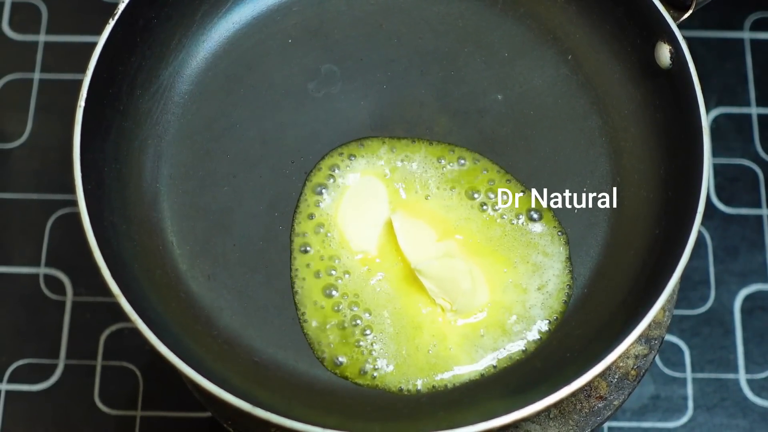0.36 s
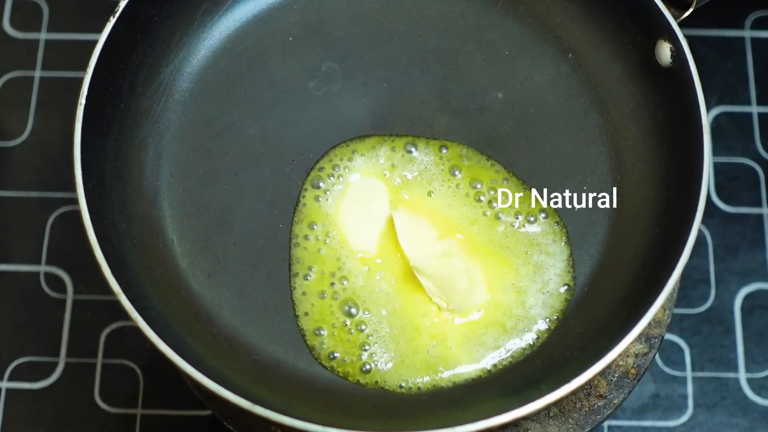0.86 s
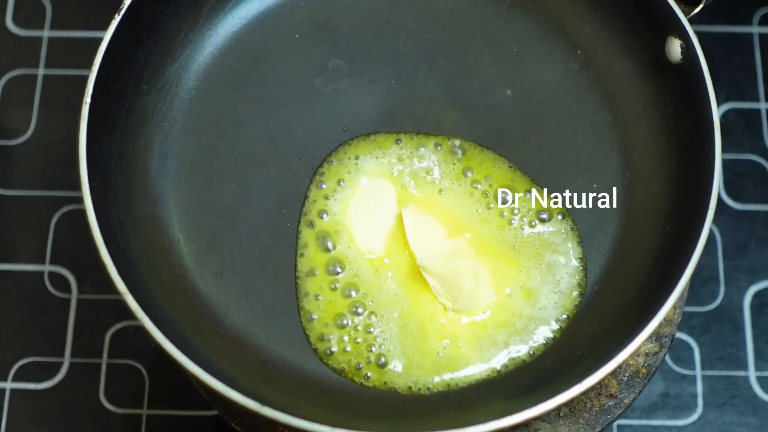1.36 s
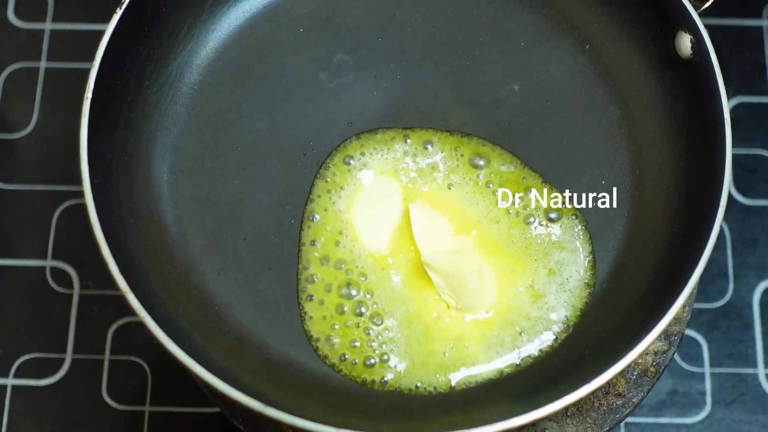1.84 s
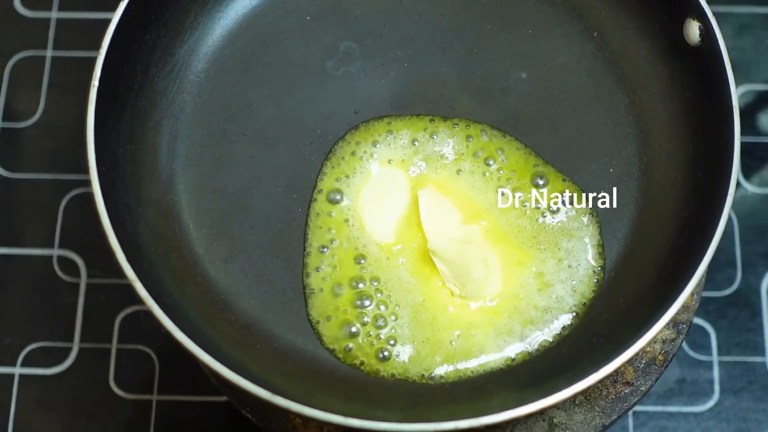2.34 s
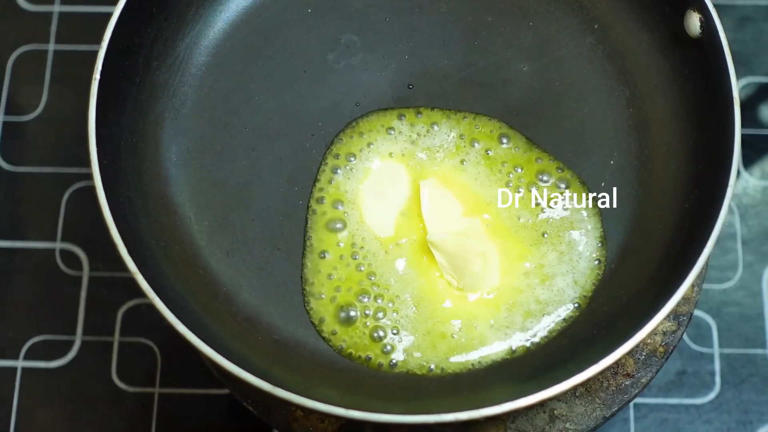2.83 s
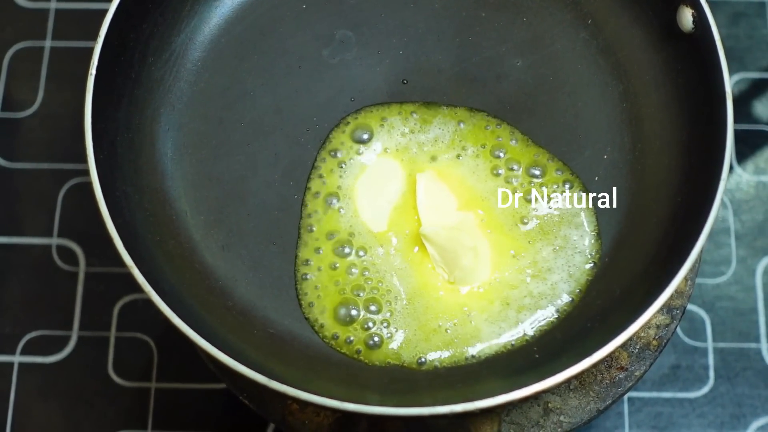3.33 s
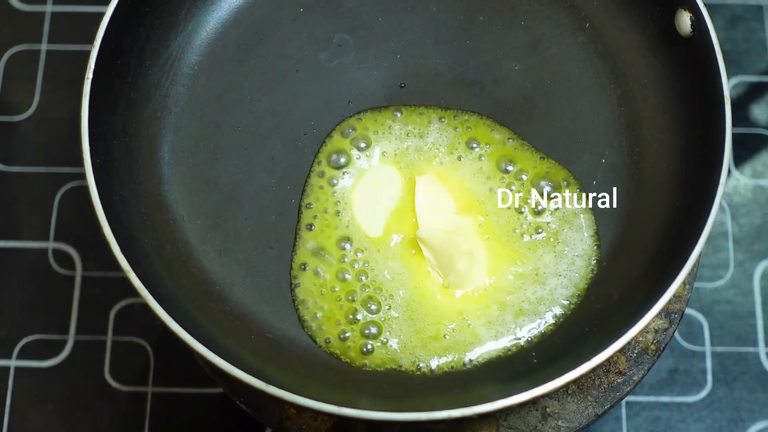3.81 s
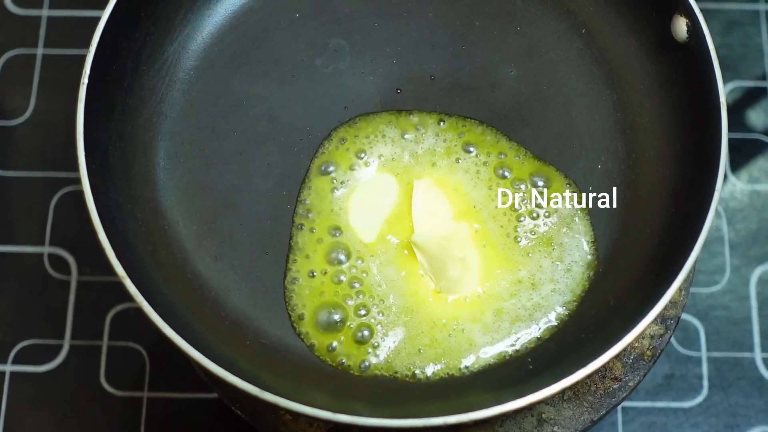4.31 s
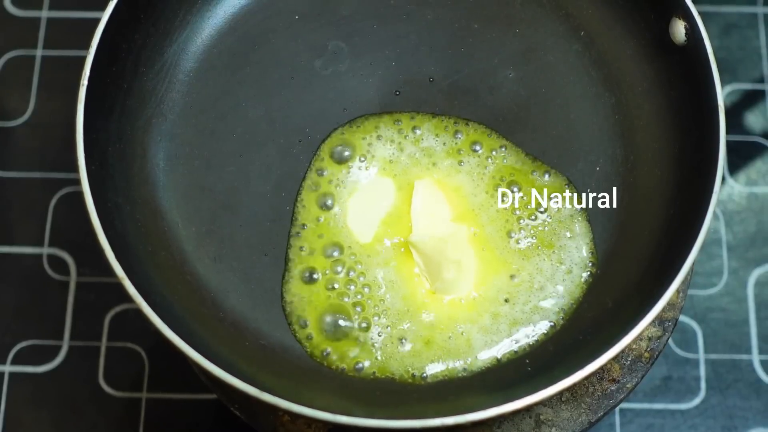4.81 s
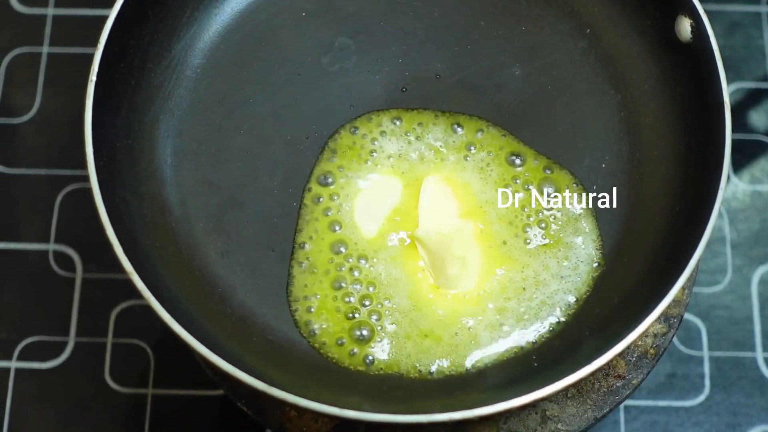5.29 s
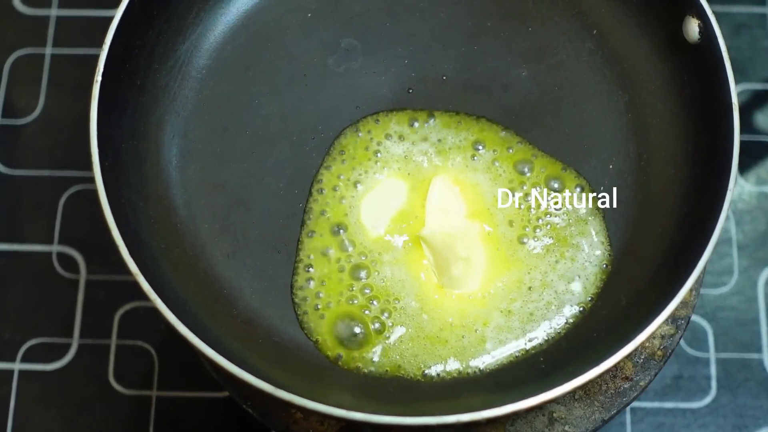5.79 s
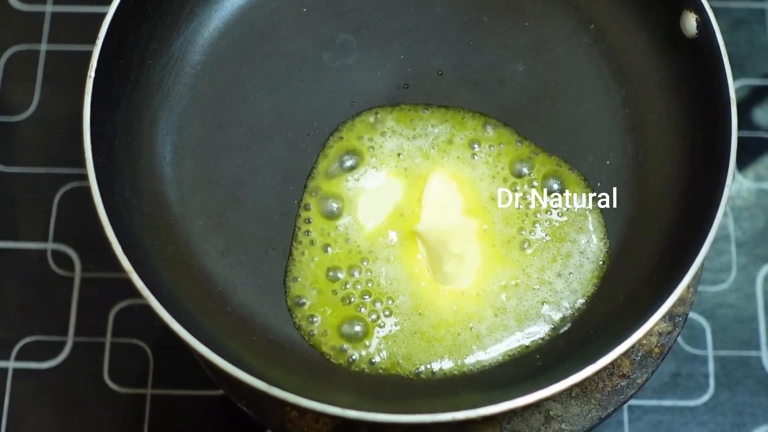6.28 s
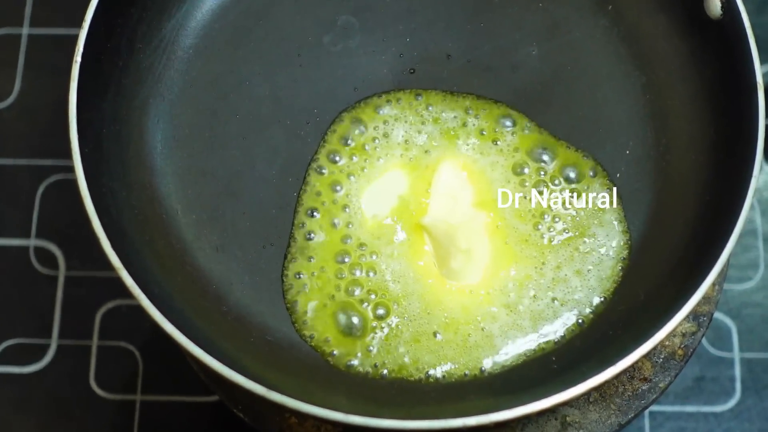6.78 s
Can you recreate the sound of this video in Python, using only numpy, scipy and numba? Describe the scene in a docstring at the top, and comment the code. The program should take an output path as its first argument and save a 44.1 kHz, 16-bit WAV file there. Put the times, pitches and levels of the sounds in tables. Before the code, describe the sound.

Close above a hot pan, melting butter sizzles continuously: a thin, bright, flickering hiss full of tiny bubble clicks, with sharper dry pops scattered on top. For the first two seconds it is fairly gentle and sparse; from about 2 seconds it thickens and crackles more often, its strength gently rising and falling. Faint muffled thuds come from far off around 0.8 and 1.6 to 2.4 seconds. At 2.96 the heated metal gives a sharp ringing tick, with weaker ones until about 3.4. A particularly sharp pop snaps at 4.1. At 5.44 something hard is knocked nearby, then from 5.85 to 5.98 it clatters loudly in a quick cluster, hollow and bright, with a thin steel shimmer abruptly damped. The sizzling and popping continue to the end at about 6.9 seconds. A very quiet low kitchen rumble lies beneath; the space is small and nearly dry.

```python
"""A quiet kitchen, microphone close above a hot frying pan in which butter melts. Steam bubbles burst through
the fat: countless tiny damped sines and noise hiss, with louder bursts on top. The heating metal ticks now and
then, ringing the pan's modes. Something hard is knocked nearby, then rattles briefly with a thin steel ring and
is stopped. The kitchen rumbles underneath in filtered noise, with a few soft thuds, some of them light knocks
on the hard object."""
import sys
import numpy as np
from scipy import signal
from scipy.fft import rfft, irfft
from scipy.io import wavfile
from scipy.ndimage import uniform_filter1d, map_coordinates
from numba import njit

SR = 44100
rng = np.random.default_rng(int(sys.argv[2]) if len(sys.argv) > 2 else 0)


def to_linear_factor(level_db):
    """Convert decibel levels (scalar or array-like) to linear amplitude factors."""
    exponent = np.asarray(level_db, float) / 20
    return 10 ** exponent


def persist_wave(psi):
    """Save psi, clipped to +-1, as 16-bit WAV."""
    counts = np.round(np.clip(psi, -1, 1) * 32767).astype(np.int16)
    wavfile.write(sys.argv[1], SR, np.atleast_2d(counts).T)


N = 304290
T = np.arange(N) / SR

# how hard the fat boils: time_s, level_db
BOIL = [(0.0, -44), (0.19, -44), (1.82, -40), (2.25, -37), (2.77, -40.5), (2.94, -40), (3.0, -38),
        (3.73, -40), (3.94, -37.5), (4.09, -38.5), (4.24, -39), (5.03, -40), (5.75, -38), (5.92, -39),
        (6.34, -39), (6.9, -37)]
# colour of the fizz inside the pan: freq_hz, gain_db
FIZZ_TONE = [(290, -104), (500, -25), (710, -17), (822, 1.5), (938, -9.5), (1090, 0), (1260, -6),
             (1390, -2.5), (1840, -7), (2980, 0.5), (5840, -1.5), (13100, -7.5), (15100, 2), (15800, 7.5),
             (16500, -63)]
# blows on the hard object: start_s, level_db, body_db (against the blow),
# body_tilt_db_per_octave, clack_tilt_db_per_octave
BLOWS = [(5.44, -11.5, -7, 4, -9), (5.583, -34.5, 2, 1, -4), (5.661, -34.5, -3.5, -5.5, -4),
         (5.847, -3.5, -16, -2, 8), (5.856, -12, -8, 6, -7), (5.862, -11.5, -22, -4, -9),
         (5.871, -7, -13.5, -2.5, -2), (5.887, -6.5, -19, 0, 5), (5.893, -11.5, -6, -2.5, -6),
         (5.898, -7, -6, -1, 4), (5.904, -19, 4.5, 2.5, -10), (5.908, -22, -6, -7, -2),
         (5.921, -8.5, -6.5, -2, 2), (5.934, -13.5, -4.5, -3, 4), (5.939, -23, -0.5, -9.5, 0),
         (5.957, -12, -8, 1, 2), (5.968, -29, -9, -2, 0), (5.979, -23.5, -4.5, -2, -1)]
RATTLE_S, STOP_S = 5.848, 5.985  # the loose rattle starts, and is stopped


def level(x, db):
    """Scale to an rms level."""
    return x * to_linear_factor(db) / np.sqrt(np.mean(x ** 2))


def curve(rows, axis=1):
    """One column of a table at every sample."""
    rows = np.array(rows)
    return np.interp(T, rows[:, 0], rows[:, axis])


def colour(x, points):
    """Smooth filter through (Hz, dB) points, straight lines over log frequency."""
    hz, db = np.transpose(points)
    f = np.maximum(np.arange(N // 2 + 1) * SR / N, 1)
    return irfft(rfft(x) * to_linear_factor(np.interp(np.log(f), np.log(hz), db)), N)


def band(x, lo_hz, hi_hz, order=2):
    """Band-pass."""
    return signal.sosfilt(signal.butter(order, [lo_hz, hi_hz], "band", fs=SR, output="sos"), x)


def walk(rate):
    """Random values, rate of them a second, joined by straight ramps; spread near 1."""
    k = int(SR / rate)
    held = np.repeat(rng.standard_normal(N // k + 1), k)
    return uniform_filter1d(held, k)[:N]


@njit
def ring(n, start, hz, fade, size, glide, rise):
    """Sum of damped sines with a soft onset, each cut off some 52 dB down; hz and glide in radians a sample."""
    out = np.zeros(n)
    for e in range(len(start)):
        z, p = size[e] + 0j, np.exp(1j * hz[e] - fade[e])
        turn, gap = np.exp(1j * glide[e]), 1.
        for i in range(start[e], min(n, start[e] + int(6 / fade[e]))):
            gap *= rise
            out[i] += z.imag * (1 - gap)
            z *= p
            p *= turn
    return out


def rings(s, hz, t60, db, glide=0., rise_s=.0001):
    """Damped sines from times, pitches, decays and levels; glide = share the pitch rises over the t60."""
    s, hz, t60, db = np.broadcast_arrays(s, np.clip(hz, 20, SR * .45), np.maximum(t60, 1e-4), db)
    w = 2 * np.pi * hz.ravel() / SR
    span = t60.ravel() * SR
    rise = np.exp(-1 / (rise_s * SR))
    start = (s.ravel() * SR).astype(np.int64)
    return ring(N, start, w, np.log(1000) / span, to_linear_factor(db.ravel()), glide * w / span, rise)


def fizz(count, spread_db, cycles, clump_db):
    """Small bubbles at random: few are big, all sizes of pitch, bare clicks to short rings, swelling in clumps."""
    u = rng.random((count, 4))
    s = u[:, 0] * N / SR * .999
    hz = 700 * (16000 / 700) ** u[:, 1]
    size_db = np.minimum(-spread_db * np.log(1 - u[:, 2]), 18)
    t60 = cycles * 6 ** u[:, 3] / hz
    grains = rings(s, hz, t60, size_db + 5.38 * np.log2(hz / 1000), glide=0.22)
    return level(colour(grains * to_linear_factor(clump_db * walk(35)), FIZZ_TONE), 0)


def middling(count):
    """Rows like the loudest bubbles', at chance moments, louder when the fat boils harder."""
    over_boil_db, level_spread_db = 18, 3.5
    pitch_hz, pitch_spread_octaves = 4630, 0.455
    ring_s, ring_spread_octaves = 0.0086, 0.57  # before each layer of a burst takes its share
    treble_db, treble_spread_db = -13.5, 8
    s, c = rng.random(count) * N / SR, rng.standard_normal((count, 4)).T
    db = np.interp(s, T, curve(BOIL)) + over_boil_db + level_spread_db * c[0]
    hz = pitch_hz * 2 ** (pitch_spread_octaves * c[1])
    t60 = ring_s * 2 ** (ring_spread_octaves * c[2])
    return np.c_[s, db, hz, t60, treble_db + treble_spread_db * c[3]]


def spits(s, db):
    """Each burst lets out a short ragged jet of steam: noise under an exponential fade."""
    jet_db, fade_s = -23, 0.0042  # start of the fade against the burst; time constant
    at = np.minimum((s.ravel() * SR).astype(int), N - 1)
    kicks = np.bincount(at, to_linear_factor(db.ravel() + jet_db), N)
    jet = signal.lfilter([1], [1, -np.exp(-1 / (fade_s * SR))], kicks)
    steam = level(colour(rng.standard_normal(N), FIZZ_TONE), 0)
    return jet * steam * to_linear_factor(3.2 * walk(600))


def sizzle():
    """Fine fizz and steam hiss follow the boil; a big bubble snaps its film, then its torn cavity rings roughly."""
    # the loudest bubbles: start_s, level_db, pitch_hz, ring_s, treble_db (snap against the bubble);
    # the layers below offset the levels and shorten the rings
    pops = [(0.1263, -7.5, 8000, 0.0013, -5), (0.268, -9, 5500, 0.0031, -6),
            (0.2896, -16, 9600, 0.0052, 5.5), (0.717, -12.5, 6000, 0.0047, 1),
            (0.7305, -13, 4860, 0.013, -20), (0.802, -6, 9990, 0.0023, -6),
            (0.8689, -11.5, 7240, 0.0044, -22), (0.9361, -17, 4320, 0.023, -20),
            (1.114, -5, 5400, 0.0045, -17), (1.2808, -10.5, 3260, 0.0041, -26),
            (1.4727, -6, 3260, 0.0039, -24), (1.483, -15.5, 4360, 0.017, -9),
            (1.65, -19.5, 9500, 0.0049, 2), (1.6928, -22.5, 1630, 0.04, 15.5),
            (1.6935, -24, 2650, 0.037, -10), (1.7784, -14, 5740, 0.0069, -19),
            (1.827, -14, 4670, 0.014, -1), (2.06, -8, 6600, 0.0062, -17), (2.262, -9, 7500, 0.027, -19),
            (2.2848, -12.5, 6100, 0.0067, -17), (2.329, -14.5, 4330, 0.015, -26),
            (2.3544, -13, 1610, 0.021, -20), (2.3884, -16, 12360, 0.0094, -1),
            (2.4266, -19, 4300, 0.021, -29), (2.521, -11, 4430, 0.0054, -21),
            (2.5587, 0, 7200, 0.0027, -26), (2.571, -16, 9450, 0.0019, -30),
            (2.7767, -11, 5200, 0.0074, -19), (2.8153, -7, 2820, 0.0036, -18),
            (2.8257, -20, 5800, 0.0298, 10), (2.8607, -14, 6400, 0.011, -16),
            (2.9976, -16, 4480, 0.0069, 3), (3.02, -8.5, 6460, 0.0044, -8),
            (3.0737, -13.5, 4240, 0.024, -26), (3.0986, -15, 5160, 0.0053, -23),
            (3.221, -14.5, 3320, 0.0034, -21), (3.2632, -6.5, 4360, 0.0067, -19),
            (3.4511, -8, 5720, 0.011, -24), (3.5001, -8, 8550, 0.0078, -19), (3.697, -13, 7540, 0.005, -10),
            (3.7308, -3.5, 5900, 0.0018, -2), (3.736, -8, 1570, 0.0057, 2), (3.765, -7, 4600, 0.005, -20),
            (3.797, -12, 4460, 0.008, -26), (3.8021, -15.5, 5230, 0.013, -10),
            (3.8488, -12, 5160, 0.0061, -10), (3.9254, -13.5, 5000, 0.0085, -23),
            (4.0077, -14, 6400, 0.014, -22), (4.027, -13, 4700, 0.011, -24), (4.054, -7, 5100, 0.0086, -27),
            (4.0821, -9.5, 3480, 0.0047, -23), (4.1154, 3.5, 6730, 0.0012, -23),
            (4.1266, -17, 5000, 0.0024, -21), (4.1464, -12.5, 7100, 0.0096, -28),
            (4.2248, -10, 7450, 0.014, -21), (4.2531, -13.5, 2890, 0.029, -22),
            (4.2715, -13, 6900, 0.0056, 4.5), (4.3767, -29, 5500, 0.0089, -12),
            (4.3907, -15.5, 5300, 0.024, -20), (4.415, -20, 3630, 0.019, -15),
            (4.4977, -9, 5800, 0.013, -23), (4.5219, -12, 1250, 0.0044, -13),
            (4.6024, -11.5, 6200, 0.0096, -17), (4.625, -11, 3670, 0.0063, -20),
            (4.6334, -2, 2870, 0.0021, -0.5), (4.6536, -10.5, 5940, 0.012, -17),
            (4.731, -12, 3630, 0.0095, -18), (4.8063, -14, 5320, 0.035, -21),
            (4.8804, -12, 2500, 0.0045, -21), (4.8894, -15, 7490, 0.0036, 1.5),
            (4.937, -10, 5900, 0.0018, -14), (4.975, -5, 3050, 0.0034, -2),
            (5.0356, -9.5, 4550, 0.0036, -12), (5.064, -17.5, 3060, 0.015, -16),
            (5.08, -12.5, 4450, 0.01, -26), (5.0858, -18, 4060, 0.0047, 5), (5.1172, -8.5, 3500, 0.013, 0),
            (5.1285, -14, 9520, 0.0046, -9.5), (5.253, -13.5, 4050, 0.018, -25),
            (5.3698, -11.5, 7700, 0.0069, -6), (5.4117, -8.5, 7140, 0.0079, -19),
            (5.4889, -21.5, 3790, 0.0086, 14.5), (5.572, -14, 6720, 0.0036, -19),
            (5.6382, -13.5, 5080, 0.014, -20), (5.741, -6, 3570, 0.0029, -24),
            (5.7754, -10, 5700, 0.0061, -17), (5.7888, -8, 4100, 0.0088, -27),
            (5.8099, -10, 3530, 0.0047, -13), (5.8283, -17.5, 5040, 0.0068, -2),
            (6.0314, -21.5, 4800, 0.015, -15), (5.459, -20, 4400, 0.0043, 12),
            (5.836, -9, 4100, 0.0098, -16), (6.0541, -12.5, 4340, 0.018, -24),
            (6.0868, -11, 2970, 0.01, -21), (6.1131, -6.5, 5440, 0.0054, -23),
            (6.1313, -15.5, 7540, 0.0054, 8), (6.2591, -12.5, 7340, 0.008, -19),
            (6.298, -12, 3860, 0.0099, -30), (6.3592, -17, 7490, 0.017, -22),
            (6.4393, -16.5, 3520, 0.018, -27), (6.5861, -16.5, 4550, 0.014, -22),
            (6.6186, -5.5, 5300, 0.0045, -6), (6.6727, -6.5, 5330, 0.01, -27),
            (6.7355, -15, 3330, 0.0092, -15), (6.824, -10.5, 4460, 0.026, -27),
            (6.886, -17.5, 5650, 0.028, -20)]
    hiss = level(colour(rng.standard_normal(N), FIZZ_TONE), -8.5) * to_linear_factor(3.5 * walk(50))  # flickers
    froth = fizz(count=16000, spread_db=2.8, cycles=2.1, clump_db=3.5) * to_linear_factor(-4.0)
    bed = fizz(count=4000, spread_db=4.43, cycles=2.16, clump_db=3.5) * to_linear_factor(-2.0)
    boiling = to_linear_factor(curve(BOIL)) * (hiss + froth + bed)
    steady_hiss = level(band(rng.standard_normal(N), 4400, 19000), -56)

    s, db, hz, t60, treble_db = np.vstack([pops, middling(count=170)]).T[:, :, None]
    chance = rng.standard_normal((len(s), 9))
    bubble = rings(s, hz, t60 * 0.58, db - 3, glide=0.09, rise_s=0.00029)
    # splinters of the burst: nearby pitches, a fraction of a millisecond or so apart
    shred_s = s + 0.00056 * np.abs(chance[:, :4])
    shreds = rings(shred_s, hz * np.exp(0.34 * chance[:, 3:7]), t60 * 0.38, db - 9.5)
    snap_s = s + 0.00031 * np.abs(chance[:, 6:])
    snap = rings(snap_s, np.array([8500, 11500, 14500]), 0.0007, db + treble_db - 1.0)
    needle = rings(s, 4900.0, 0.00063, db - 6.5, rise_s=.00002)  # the first tear: one bare click
    return boiling + bubble + shreds + snap + needle + spits(s, db) + steady_hiss


def kitchen():
    """Low noise rumble nearly alike on both sides, a looser band above it, and soft thuds as damped sines, some
    of them light knocks on the hard object."""
    # strength of the rumble: time_s, low_db, upper_db
    rumble_levels = [(0.0, -59, -62.5), (0.4, -62.5, -63.5), (1.9, -65, -60.5), (2.09, -59, -56.5),
                     (3.59, -65.5, -61), (4.44, -61.5, -61), (4.8, -62.5, -60), (5.03, -54, -62),
                     (5.78, -63.5, -58), (5.98, -60, -53), (6.46, -65, -63.5), (6.9, -60, -60.5)]
    # colour of the low rumble: freq_hz, gain_db
    rumble_tone = [(20, -32), (45, -27), (62, -8), (90, -1), (112, -4.5), (135, -2), (160, -6), (250, -32)]
    # colour of the looser band: freq_hz, gain_db
    murk_tone = [(90, -23), (150, -4), (220, 0.5), (320, -1.5), (420, -5), (550, -3.5), (750, -0.5),
                 (1100, -30)]
    # soft thuds, including light early knocks on the hard object's body: start_s, level_db (before a common
    # trim), pitch_hz
    thuds = [(0.814, -45, 568), (0.83, -40, 576), (0.845, -38.5, 598), (1.563, -49, 251), (1.689, -49, 279),
             (1.946, -36.5, 233), (2.02, -37.5, 277), (2.352, -47, 260), (5.959, -32, 560)]
    low, upper = rng.standard_normal((2, 2, N))
    sides = np.array([[1], [-1]])
    low = low[0] + 0.29 * sides * low[1]
    upper = upper[0] + 0.51 * sides * upper[1]
    rumble = level(np.array([colour(v, rumble_tone) for v in low]), 0) * to_linear_factor(curve(rumble_levels))
    murk = level(np.array([colour(v, murk_tone) for v in upper]), 0) * to_linear_factor(curve(rumble_levels, axis=2))
    s, db, hz = np.transpose(thuds)
    return rumble + murk + rings(s, hz, 0.073, db - 1.5, rise_s=0.00035)


def struck(s, db, modes, tilt_db, rise_s):
    """Every blow rings all modes, tilted in dB per octave about the median mode, with a little chance."""
    delay_s = 0.0013  # the modes start this long after the listed time
    hz, mode_db, t60 = np.transpose(modes)
    share = np.outer(tilt_db, np.log2(hz / np.median(hz))) + 2 * rng.standard_normal((len(s), len(hz)))
    return rings(s[:, None] + delay_s, hz, t60, db[:, None] + mode_db + share, rise_s=rise_s)


def ticks():
    """Hot metal slips, then slips again more weakly, ringing the pan briefly each time."""
    # the pan metal ticking with heat: start_s, level_db (before the slips' own offsets)
    slips = [(2.9595, -6.5), (3.1368, -20.5), (3.286, -14.5), (3.366, -33)]
    # resonances of the pan: freq_hz, level_db, t60_s
    pan_modes = [(2700, -11.5, 0.063), (2870, -16.5, 0.043), (5724, 3, 0.035), (6090, -2.5, 0.024),
                 (9580, -1, 0.0084), (5840, -28.5, 0.34)]
    s, db = np.transpose(slips)
    both_s, both_db = np.r_[s, s + .005], np.r_[db - 3.0, db - 9]
    return struck(both_s, both_db, pan_modes, np.zeros(2 * len(s)), rise_s=0.0002)


def rattle():
    """Blows ring a hollow body and a bright part, with loose noisy chatter between them until the stop."""
    # resonances of the hollow body: freq_hz, level_db, t60_s
    body_modes = [(387, -8, 0.027), (556, -6, 0.084), (607, -1.5, 0.07), (904, 2, 0.074),
                  (1047, 5.5, 0.028), (1208, 1, 0.028), (1450, -1.5, 0.025), (1780, -2, 0.03),
                  (2226, -1, 0.025)]
    # resonances of the bright part: freq_hz, level_db, t60_s
    clack_modes = [(2920, -11, 0.023), (3270, 7.5, 0.0087), (3700, 2, 0.019), (4290, -5, 0.026),
                   (4454, 6, 0.013), (4660, -13, .02), (6200, -2, 0.018), (8360, -4.5, 0.0058)]
    chatter_db, release_s = -26.5, 0.0027  # rms before gating; time constant after the stop
    s, db, body_db, body_tilt, clack_tilt = np.transpose(BLOWS)
    body = struck(s, db + body_db - 4.0, body_modes, body_tilt, rise_s=0.00059)
    clack = struck(s, db - 10.0, clack_modes, clack_tilt, rise_s=0.00018)
    grit = rng.standard_normal(N) * to_linear_factor(2.9 * rng.exponential(size=N) + 5.8 * walk(250))
    shaken = (T > RATTLE_S) * np.exp(-np.maximum(T - STOP_S, 0) / release_s)
    return body + clack + level(band(grit, 390, 4800), chatter_db) * shaken


def steel():
    """The rattle's first blow sets thin steel singing, later ones nudge it; it flutters until a touch damps it."""
    # resonances of the thin steel: freq_hz, level_db, t60_s
    steel_modes = [(5680, -26, .8), (7825, -31, .8), (8914, -21, .3), (12646, -32, .35), (13370, -36, .6)]
    first_db, rehit_db = 3.5, -13.5  # against the blow; later blows add rehit_db too
    s, db = np.array([row[:2] for row in BLOWS if row[0] > RATTLE_S - .01]).T
    song_db = db + first_db + rehit_db * (s > s[0])
    song = struck(s, song_db, steel_modes, 0 * s, rise_s=0.007)
    damping = np.exp(-np.maximum(T - STOP_S, 0) / 0.004)
    return song * damping * to_linear_factor(1.2 * walk(120))  # loose contact flutters


def space(x, tail_db, t60):
    """Early echoes off the surfaces, then a short diffuse tail that differs left and right."""
    # off the pan wall and stove: delay_s, gain_db
    wall_echoes = [(.0011, -42), (.0026, -18.5), (.0043, -21.5), (.0062, -18.5)]
    out = x + sum(to_linear_factor(db) * np.roll(x, int(s * SR)) for s, db in wall_echoes)
    t = np.arange(SR // 4) / SR
    tail = rng.standard_normal((2, len(t))) * np.exp(-np.log(1000) * t / t60)
    tail *= to_linear_factor(tail_db) / np.sqrt(np.sum(tail ** 2, axis=1, keepdims=True))
    return out + signal.fftconvolve(x[None], tail, axes=1)[:, :N]


def scene():
    """Pan, rattle, steel and kitchen together; small sources radiate no bass."""
    rattle_pan_db, steel_pan_db = -1, -4  # left minus right
    steel_lag_s = .000014  # heard from the side, the steel reaches the left port later
    halves = np.array([[.5], [-.5]])
    pan = space(band(sizzle() + ticks(), 1104, 13400, order=3), tail_db=-12, t60=0.067)
    knocks = space(band(rattle(), 605, 14000, order=3), tail_db=-11.5, t60=0.2)
    song = steel()
    late_song = map_coordinates(song, [(T - steel_lag_s) * SR])
    song = to_linear_factor(halves * steel_pan_db) * np.array([late_song, song])
    return pan + to_linear_factor(halves * rattle_pan_db) * knocks + song + kitchen()


def top_cut(x):
    """Nothing passes above the cut-off."""
    return signal.sosfilt(signal.butter(12, 16970, fs=SR, output="sos"), x)


def record(dry):
    """Two close microphone ports of unlike colour, without deep bass or the highest treble."""
    # how the ports differ: freq_hz, left_minus_right_db
    balance = [(60, -2.5), (110, -2.0), (200, -1.5), (380, -1.0), (700, -1.5), (1290, -1.0), (2380, -0.5),
               (4400, 0.5), (8120, -0.5), (15000, -0.5)]
    half = [(hz, db / 2) for hz, db in balance]
    x = np.array([colour(dry[0], half), colour(dry[1], [(hz, -db) for hz, db in half])])
    x = signal.sosfilt(signal.butter(2, 50, "high", fs=SR, output="sos"), x)
    x = signal.sosfilt(signal.ellip(6, .2, 50, 15900, fs=SR, output="sos"), x)
    return top_cut(x)


dry = scene()
out = record(dry)
persist_wave(out)
```